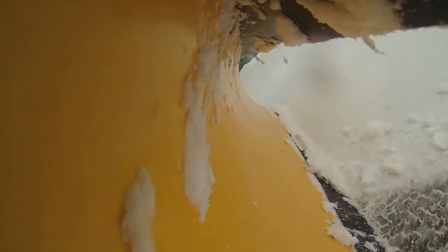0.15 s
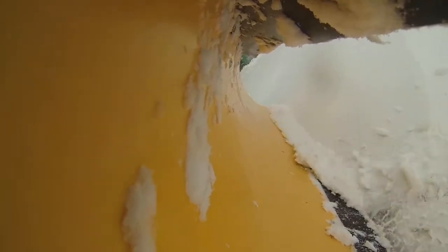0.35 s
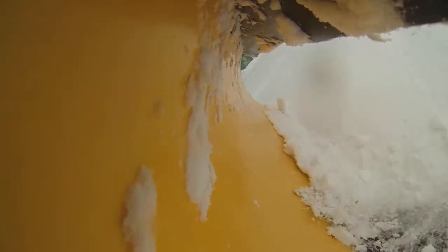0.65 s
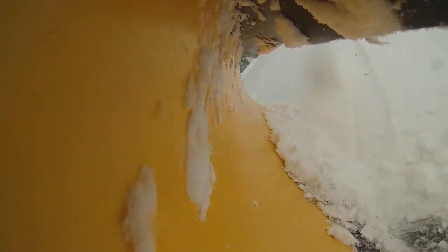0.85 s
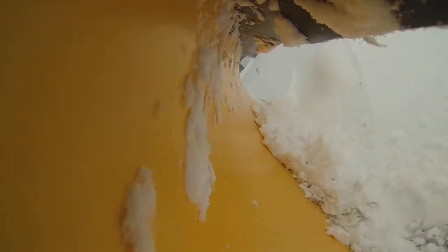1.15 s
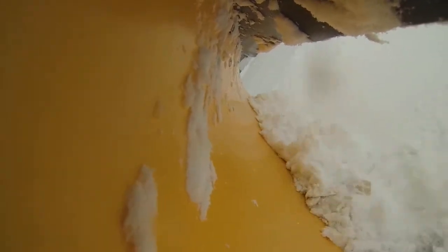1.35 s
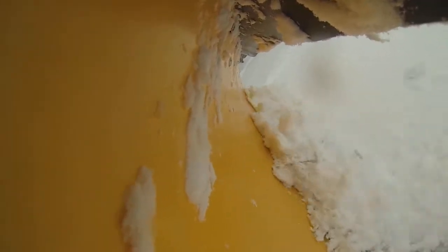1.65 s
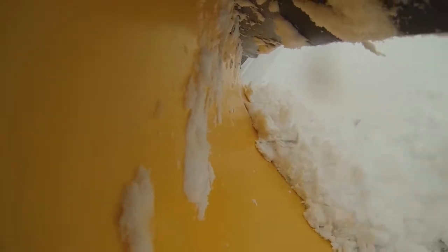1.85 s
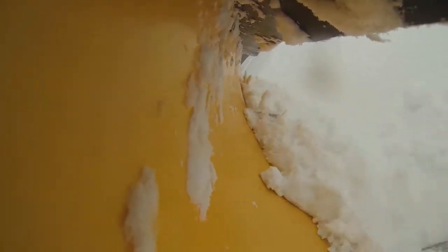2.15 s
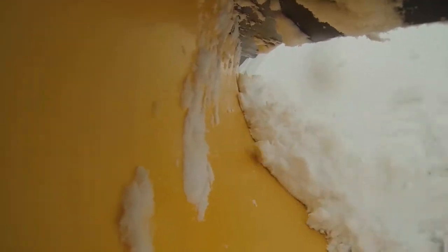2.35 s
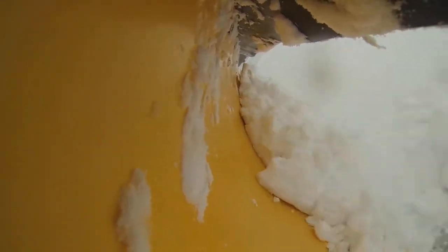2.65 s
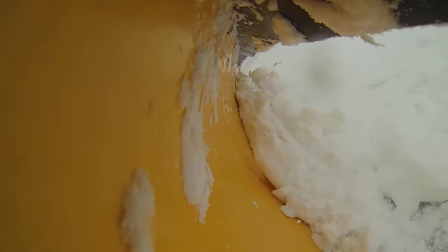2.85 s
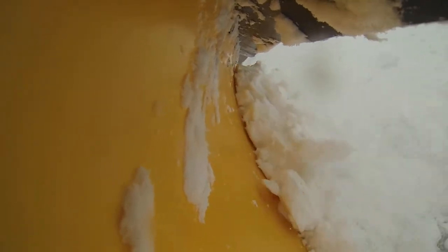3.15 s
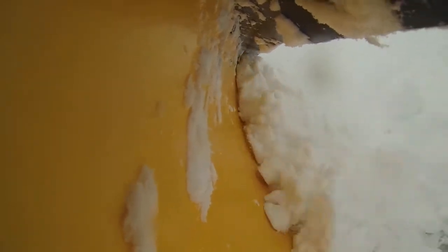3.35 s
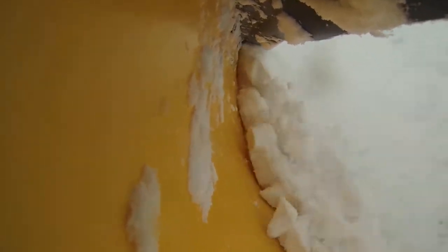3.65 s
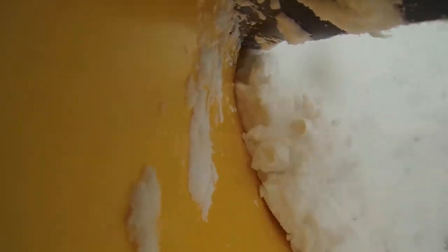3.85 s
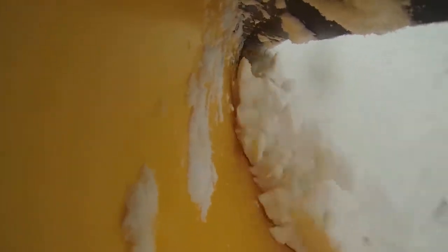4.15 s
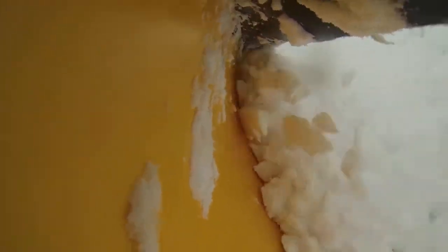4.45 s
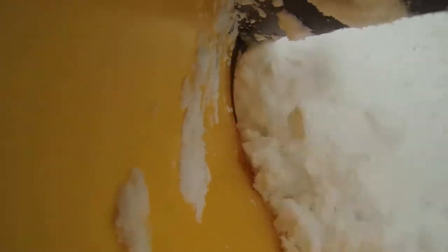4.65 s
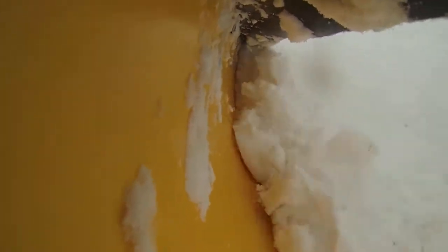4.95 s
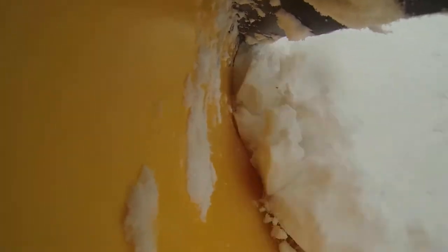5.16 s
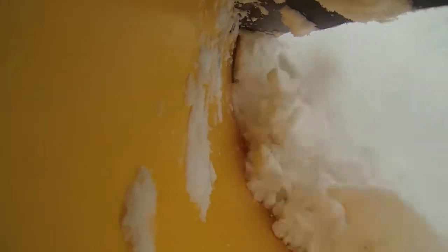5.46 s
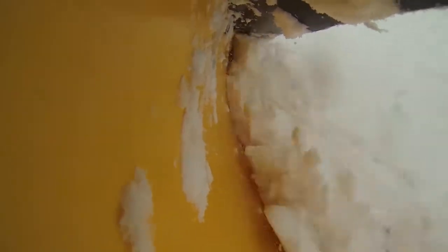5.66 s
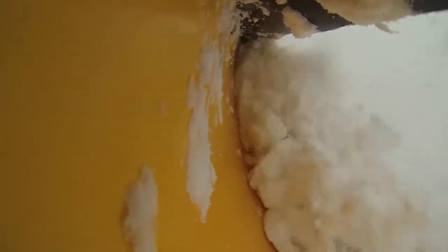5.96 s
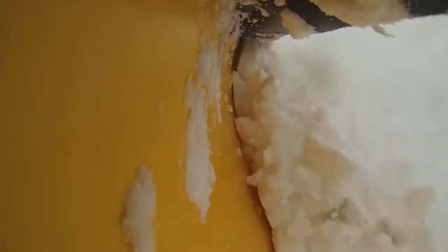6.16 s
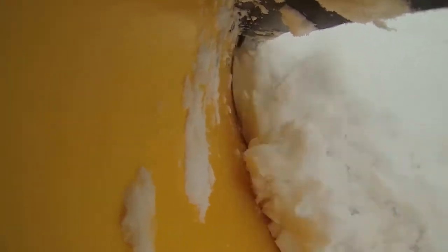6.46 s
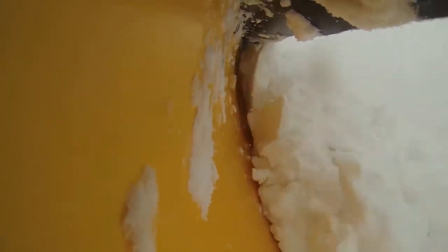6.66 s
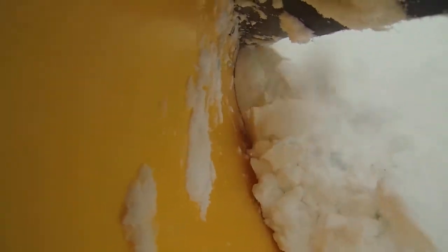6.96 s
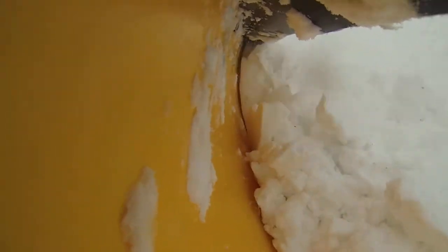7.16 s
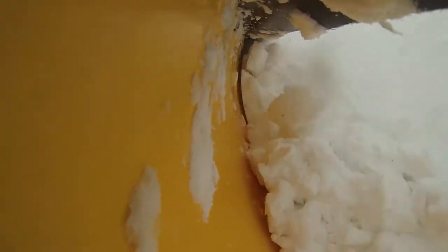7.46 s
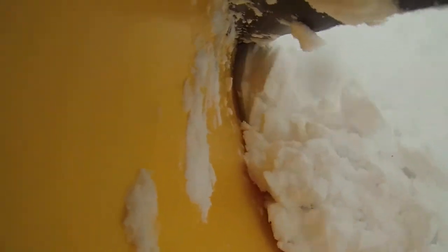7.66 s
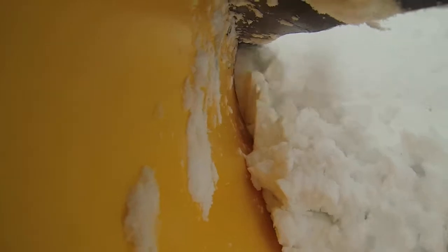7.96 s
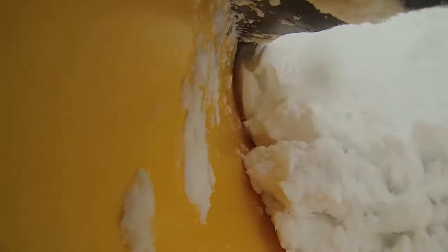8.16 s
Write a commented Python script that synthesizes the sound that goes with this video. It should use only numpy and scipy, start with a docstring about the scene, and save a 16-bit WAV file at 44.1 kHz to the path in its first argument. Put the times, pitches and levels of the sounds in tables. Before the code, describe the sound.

On a snowy paved road, a microphone attached to a plow's steel blade picks up strong, uneven low rumble and a wavering engine drone. A bump and knock open at 0 seconds; brief rough scuffs and hollow shudders come and go until about 1.5, with low chattering around 0.3 to 0.6 and a heavy thump near 1.3. Grinding then builds, the drone strengthens around 2, and a deep blade chatter swells at 2.5. By 2.8 the scrape is dense and gritty, with bright stone ticks. A single sharp, dry click snaps at 3.2 and a thump lands at 3.5. From about 3.8, hollow snow-chunk knocks and metallic snags multiply; the drone surges near 5.25. Between 6.1 and 7.3 they cluster thickly, with a tiny squeak at 6.4. More snags and a louder, very short squeak at 8.1 precede the abrupt end at 8.3.

```python
"""On a paved road a snowplow pushes snow, heard by a camera fixed to its steel blade. The juddering cutting
edge grinds grit: dense random impacts excite plate resonances, with sparse ticks as crackle. The blade shudders
and chatters; chunks, bumps, snags and stones strike it, and it gives two squeaks. One sharp click is heard. The
frame rumbles under the noise of snow sliding on steel, and two wavering sines form the engine drone. The
camera's limiter holds the peaks down."""
import sys
import numpy as np
from scipy import signal
from scipy.fft import rfft, irfft
from scipy.io import wavfile
from scipy.ndimage import uniform_filter1d, minimum_filter1d

SR = 44100
rng = np.random.default_rng(int(sys.argv[2]) if len(sys.argv) > 2 else 0)


def log_audio(samples):
    """Write samples as a 16-bit WAV file to the path given in sys.argv[1]."""
    # one column per channel
    frames = np.atleast_2d(samples).T
    # limit to full scale, then quantise
    limited = np.clip(frames, -1, 1)
    pcm = np.round(limited * 32767).astype(np.int16)
    wavfile.write(sys.argv[1], SR, pcm)


N = 366471
TIME = np.arange(N) / SR  # seconds
TAPS = 16384  # length of a body's impulse response in samples
FREQ = np.maximum(np.arange(TAPS // 2 + 1) * SR / TAPS, 1)  # hertz
REFERENCE_DB = -35  # grinding level at which the shudder and sliding levels are set

# Ringing of the steel plate. Each row: resonance in hertz, width in hertz, relative level in dB.
PLATE_MODES = [(530, 218, -3), (706, 98, 2), (744, 60, 0.5), (936, 360, -8.5), (1182, 120, -1.5),
               (1352, 261, 4), (1508, 270, -4.5), (1966, 240, -18.5), (2295, 600, -25.5), (2820, 210, -24),
               (3060, 260, -24.5), (3560, 690, -29), (4526, 1200, -39), (6100, 3830, -47.5),
               (11000, 8700, -60)]
# Bending of the whole blade. Each row: resonance in hertz, width in hertz, relative level in dB.
BLADE_MODES = [(180.5, 45.3, 2.5), (231.6, 75, 4), (288.6, 90, -0.5), (327.6, 40, -2), (427.6, 63, -10),
               (494, 120, -20.5)]
# Modes of the plow frame. Each row: resonance in hertz, width in hertz, relative level in dB.
FRAME_MODES = [(34.6, 19.1, 1), (52.5, 42, -7), (75.15, 13, 0), (97.8, 42.7, -2), (128, 21, -4.5),
               (149, 14, -7.5), (182.2, 16.6, -10)]
# Larger stones and ice lumps cracking under the edge.
# Each row: start in seconds, loudest short-time level above 2.8 kHz in dB.
STONE_CRACKS = [(0.018, -34), (0.027, -41.5), (0.045, -42.5), (0.185, -41.5), (0.291, -51), (0.349, -44),
                (0.404, -53), (0.585, -50), (0.698, -50), (0.744, -50), (0.856, -48), (0.941, -46),
                (1.002, -34.5), (1.016, -47), (1.265, -46), (1.346, -35), (2.077, -39), (2.177, -34.5),
                (2.809, -33.5), (2.824, -37), (3.502, -36), (3.562, -33.5), (3.618, -28.5), (3.8, -37.5),
                (3.867, -41), (3.884, -33.5), (4.34, -41.5), (4.368, -42), (4.381, -32), (4.467, -43),
                (4.864, -41), (5.308, -41), (5.612, -38), (5.635, -32.5), (5.722, -35.5), (5.845, -33.5),
                (5.898, -34.5), (6.264, -35), (6.322, -37), (6.388, -38), (6.695, -38.5), (6.779, -38),
                (6.811, -38), (6.868, -32), (7.027, -41), (7.055, -35), (7.066, -36), (7.08, -35),
                (7.176, -35), (7.28, -41.5), (7.314, -42), (7.323, -35.5), (7.36, -43), (7.463, -39.5),
                (7.585, -35.5), (7.975, -41), (8.261, -35.5)]


def undb(db):
    """Logarithmic level: decibels become an amplitude ratio."""
    return 10 ** (np.asarray(db) / 20)


def unit(x):
    """Normalization: scale a signal to an rms of one."""
    return x / np.sqrt(np.mean(x ** 2))


def curves(table):
    """Linear interpolation: join each column of a table by straight lines in time."""
    seconds, *columns = np.transpose(table)
    return [np.interp(TIME, seconds, column) for column in columns]


def walk(rate):
    """Band-limited fluctuation: random levels, this many a second, joined by ramps; the rms is one."""
    step = max(int(SR / rate), 2)
    held = np.repeat(rng.standard_normal(N // step + 1), step)
    return unit(uniform_filter1d(held, step)[:N])


def swell(middle, length):
    """Raised-cosine envelope: a smooth rise from 0 to 1 and back around the middle, in seconds."""
    return np.cos(np.pi * np.clip((TIME - middle) / length, -.5, .5)) ** 2


def steady(x, span):
    """Level equalization: divide by the local rms, smoothed twice over this many seconds."""
    width = int(span * SR)
    power = uniform_filter1d(uniform_filter1d(x ** 2, width), width)
    return x / np.sqrt(np.maximum(power, 1e-12))


def add(out, start, sound):
    """Superposition: mix a short sound in at its start in seconds."""
    i = max(int(start * SR), 0)
    out[i:i + len(sound)] += sound[:N - i]


def impacts(rate, spread_db, largest=5.0):
    """Poisson-like impacts, mostly small; the largest lie this many spreads above the smallest."""
    chance = rng.random(N)
    size = np.minimum(rng.exponential(size=N), largest)
    return (chance < rate / SR) * undb(spread_db * size)


def resonances(modes):
    """Modal response: add the powers of steep-sided resonances and return the gain over frequency."""
    power = 0
    for hz, width, db in modes:
        detune = (FREQ / hz - hz / FREQ) * hz / width
        power = power + undb(db) ** 2 / (1 + detune ** 2 / 2) ** 3
    return np.sqrt(power)


def hard_plate():
    """Contact stiffness: a hard, short contact favours the treble of the plate."""
    # Treble emphasis of a hard contact. Each row: frequency in hertz, added gain in dB.
    contact_tone = [(600, -21.5), (1500, -12.5), (2400, 4), (3100, 8), (3700, 2.5), (5000, 7.5),
                    (10500, 13), (15000, 9)]
    hz, db = np.transpose(contact_tone)
    return resonances(PLATE_MODES) * undb(np.interp(np.log(FREQ), np.log(hz), db))


def colours(gain, ripple_db, octaves, count):
    """Position-dependent modal excitation: each struck spot has random humps, spaced in octaves."""
    humps = rng.standard_normal((count, 96))
    position = np.log2(FREQ) / octaves
    ripple = np.array([np.interp(position, np.arange(len(h)), h) for h in humps])
    ripples = undb(ripple_db * ripple)
    return gain * ripples / np.sqrt(np.mean(ripples ** 2, axis=0))


def ring(force, gain):
    """Minimum-phase filtering: pass a force through the causal body that has this gain."""
    cepstrum = irfft(np.log(gain + 1e-7))
    # Folding the cepstrum forward in time makes the response causal.
    cepstrum[1:TAPS // 2] *= 2
    cepstrum[TAPS // 2 + 1:] = 0
    response = irfft(np.exp(rfft(cepstrum)))
    return signal.fftconvolve(force, response)[:len(force)]


def strike(gain, length, above_hz, span):
    """Impulsive excitation: a noise burst rings a body; its loudest span above above_hz has unit rms."""
    t = TIME[:SR // 10]
    force = rng.standard_normal(len(t)) * np.sqrt(t / length) * np.exp(-t / length)
    sound = ring(force, gain)
    highs = signal.sosfilt(signal.butter(4, above_hz, "high", fs=SR, output="sos"), sound)
    return sound / np.sqrt(uniform_filter1d(highs ** 2, int(span * SR)).max())


def scuffing():
    """Contact load modulation: the edge digs in, adding dB of grinding and shudder, then lets go."""
    # The edge digs in and scuffs. Each row: start of the full scuff in seconds, its length in seconds,
    # extra grinding in dB, extra shudder in dB.
    scuff_events = [(0.012, 0.009, 10, 8), (0.252, 0.096, 7, 7.5), (0.528, 0.055, 9.5, 9.5),
                    (0.736, 0.05, 5.5, 8.5), (0.983, 0.085, 6.5, 6), (1.293, 0.074, 9, 10),
                    (1.534, 0.1, 6.5, 10), (2.013, 0.18, 5, 2), (3.192, 0.31, 2.5, 4.5),
                    (3.928, 0.075, 0.5, 6), (5.14, 0.13, 3.5, 6.5), (5.589, 0.17, 2.5, 2.5),
                    (6.133, 0.12, 1, 5.5), (6.802, 0.09, 5.5, 4.5), (7.034, 0.21, 3.5, 4.5),
                    (7.976, 0.15, 2.5, 3.5)]
    attack_s, release_s = 0.0092, 0.032  # the attack precedes the full scuff
    grind, shake = np.zeros(N), np.zeros(N)
    for start, length, grind_db, shake_db in scuff_events:
        rise = np.clip((TIME - start) / attack_s + 1, 0, 1)
        fall = np.clip(1 - (TIME - start - length) / release_s, 0, 1)
        grind += grind_db * rise * fall
        shake += shake_db * rise * fall
    return grind, shake


def lifting():
    """Loss of contact: the edge rides up, and grinding and shaking change by a smooth dip in dB."""
    # The edge loses its grip. Each row: middle in seconds, length in seconds,
    # drop of the grinding in dB, drop of the shaking in dB (negative is a rise).
    lift_events = [(0.143, 0.23, 3.5, 8), (0.688, 0.1, 5.5, 0.5), (0.86, 0.089, 13.5, 7),
                   (1.197, .15, 11, 14), (1.467, .14, 4, 4), (2.935, 0.16, 3.5, 3), (3.715, 0.096, 4, -1),
                   (4.155, 0.051, 10.5, 7), (5.059, 0.34, 2.5, 2), (5.948, 0.13, 8.5, 4),
                   (6.428, 0.18, 4, 5), (7.922, 0.11, 3, 0), (8.185, 0.057, 9, 10)]
    grind, shake = np.zeros(N), np.zeros(N)
    for middle, length, grind_db, shake_db in lift_events:
        height = swell(middle, length)
        grind += grind_db * height
        shake += shake_db * height
    return grind, shake


def crumbling():
    """Fragmentation: crumbs gather under the edge around each stone; their density runs from 0 to 1."""
    crumble_s, lead_s = 0.035, 0.027  # the crumbs begin shortly before the stone's crack
    crumbs = np.zeros(N)
    for start, _ in STONE_CRACKS:
        add(crumbs, start - lead_s, np.hanning(int(crumble_s * SR)))
    return np.minimum(crumbs, 1)


def grinding(judder, bite_db):
    """Dense random excitation: grains ring the plate in bursts as the contact hops along the edge."""
    force = impacts(rate=2800, spread_db=0.94) * rng.standard_normal(N) * undb(2.2 * judder)
    cushion_hz = 6500  # packed snow softens these contacts
    gain = resonances(PLATE_MODES) / np.sqrt(1 + (FREQ / cushion_hz) ** 6)
    spots = colours(gain, ripple_db=3.5, octaves=.25, count=5)
    hops = np.cumsum(impacts(rate=110, spread_db=0) > 0)
    contact = rng.integers(len(spots), size=N)[hops]
    sound = sum(ring(force * (contact == k), spot) for k, spot in enumerate(spots))
    return steady(sound, span=0.054) * undb(bite_db)


def crackle(judder, bite_db):
    """Brittle fracture: grit and ice tick, dull or bright, clustering under load and around stones."""
    crumbs = crumbling()
    excess_db = bite_db - bite_db.mean()
    density_db = 0.33 * excess_db + 1.9 * judder + 2.5 * walk(rate=24) + 3.0 * crumbs
    rate = 125 * undb(density_db)  # ticks per second
    bursts = impacts(rate, spread_db=9.0, largest=1.5) * undb(2.1 * crumbs + 0.39 * excess_db)
    brittle_hz = 9000  # ice breaks less sharply than stone
    gain = hard_plate() / np.sqrt(1 + (FREQ / brittle_hz) ** 4)
    spots = colours(gain, ripple_db=6, octaves=.7, count=4)
    contact = rng.integers(len(spots), size=N)
    grit = rng.standard_normal(N)
    fade = [1, -np.exp(-1 / (0.00074 * SR))]  # each tick decays with a 0.74 ms time constant
    sound = np.zeros(N)
    for k, spot in enumerate(spots):
        envelope = signal.lfilter([1], fade, bursts * (contact == k))
        sound += ring(envelope * grit, spot)
    return unit(sound) * undb(-48.0)


def sliding(bite_db):
    """Friction noise: snow on steel excites a faint band near 3 kHz that follows the bite of the edge."""
    # The plate singing under snow. Each row: resonance in hertz, width in hertz, relative level in dB.
    slide_modes = [(3045, 240, 0)]
    scrape = unit(ring(rng.standard_normal(N), resonances(slide_modes)))
    return scrape * undb(-72.5 + .5 * (bite_db - REFERENCE_DB) + 1.1 * walk(rate=25))


def shudder(judder, load_db, grip_db):
    """Bending vibration: judder shakes the whole blade, a hollow clatter that grows with the load."""
    force = impacts(rate=800, spread_db=0.93) * rng.standard_normal(N) * undb(1.4 * judder)
    reference_shudder_db, db_per_load_db = -25, 0.75
    db = reference_shudder_db + db_per_load_db * (load_db - REFERENCE_DB) + grip_db
    return steady(ring(force, resonances(BLADE_MODES)), span=0.065) * undb(db)


def rumble(lift_db):
    """Structure-borne vibration: road bumps shake the frame; all but the deepest eases in a lift."""
    force = impacts(rate=400, spread_db=0.5) * rng.standard_normal(N)
    frame = steady(ring(force, resonances(FRAME_MODES)), span=0.07)
    deep_hz = 56  # rumble well below this goes on when the edge lifts
    deep = signal.sosfiltfilt(signal.butter(2, deep_hz, fs=SR, output="sos"), frame)
    eased = deep + (frame - deep) * undb(-lift_db)
    return eased * undb(-14 + 1.08 * walk(rate=4.2))


def engine():
    """Harmonic excitation: the firing rate and its weaker octave drone through the mount and waver."""
    # Course of the drone. Each row: time in seconds, level in dB before its random waver.
    engine_levels = [(0, -33), (1.3, -26.5), (2.0, -21), (3.3, -23), (4.6, -28), (5.25, -18), (5.8, -24),
                     (8.31, -31.5)]
    firing_hz = 95.4  # central rate
    db, = curves(engine_levels)
    phase = 2 * np.pi * np.cumsum(firing_hz * (1 + 0.0271 * walk(rate=25))) / SR
    drone = np.sin(phase) + undb(-15.5) * np.sin(2 * phase)
    return unit(drone) * undb(db + 3.2 * walk(rate=14))


def chunk_knocks():
    """Impulse response of the blade: packed chunks of snow knock hollowly, with a little plate ring."""
    # Knocking chunks. Each row: start in seconds, loudest short-time level above 200 Hz in dB.
    chunk_hits = [(0.012, -16.5), (3.956, -15), (4.315, -19), (4.553, -16), (5.132, -14), (5.425, -18),
                  (5.728, -15.5), (6.227, -16), (6.666, -14), (6.803, -14), (7.062, -16), (7.143, -22)]
    out = np.zeros(N)
    blade = np.hypot(resonances(BLADE_MODES), undb(-21.5) * resonances(PLATE_MODES))
    for start, db in chunk_hits:
        add(out, start, strike(blade, length=0.0063, above_hz=200, span=0.0057) * undb(db))
    return out


def frame_thumps():
    """Impulse response of the frame: bumps in the road excite its low modes."""
    # Thumping bumps. Each row: start in seconds, loudest short-time level above 55 Hz in dB.
    bump_hits = [(0.013, -9.5), (1.257, -7.5), (3.485, -7), (4.331, -10.5), (6.262, -9), (7.235, -8.5),
                 (8.141, -11)]
    out, frame = np.zeros(N), resonances(FRAME_MODES)
    for start, db in bump_hits:
        add(out, start, strike(frame, length=0.0039, above_hz=55, span=0.0073) * undb(db))
    return out


def snag_knocks():
    """Impulse response of the plate: the edge snags on the pavement, each time more or less hollow."""
    # Snags. Each row: start in seconds, loudest short-time level above 1 kHz in dB,
    # extra hollow ring below 1 kHz in dB.
    snag_hits = [(0.016, -25.5, -12), (2.645, -28, -1), (3.774, -23.5, -5), (3.962, -24, -0.5),
                 (4.318, -30, 7), (5.74, -22.5, -3), (5.879, -24.5, -6), (6.116, -32, 21),
                 (6.203, -20.5, -1), (6.669, -21.5, 3.5), (6.811, -23.5, -5), (6.858, -23, 1),
                 (7.024, -21.5, 4), (7.049, -19.5, -1), (7.074, -27, 7), (7.16, -21, -0.5),
                 (7.114, -25, -2), (7.788, -24.5, -6.5), (7.837, -24.5, 0), (7.983, -21.5, -4),
                 (8.061, -26, 4), (8.139, -23, 1)]
    out, plate = np.zeros(N), resonances(PLATE_MODES)
    knock_hz = 1000
    hollow = 1 / (1 + (FREQ / knock_hz) ** 10)
    for start, db, hollow_db in snag_hits:
        body = plate * undb(hollow_db * hollow)
        add(out, start, strike(body, length=0.0033, above_hz=knock_hz, span=0.0029) * undb(db))
    return out


def stone_ticks():
    """Hard-contact impulse response: stones tick on the plate, each with its own colour."""
    out = np.zeros(N)
    spots = colours(hard_plate(), ripple_db=1.5, octaves=0.95, count=len(STONE_CRACKS))
    for (start, db), spot in zip(STONE_CRACKS, spots):
        add(out, start, strike(spot, length=0.00086, above_hz=2800, span=0.0013) * undb(db))
    return out


def chatters(judder):
    """Stick-slip locking: the blade holds roughly onto one resonance, swells and lets go."""
    # Chattering notes. Each row: middle in seconds, central frequency in hertz,
    # level in dB before a 2 dB boost and the judder, length in seconds.
    chatter_notes = [(0.279, 745, -27, 0.025), (0.299, 215, -20.5, 0.18), (0.406, 126.6, -18.5, 0.49),
                     (0.566, 175.3, -16.5, 0.13), (2.468, 181.4, -19.5, 0.9), (2.508, 131.2, -14, 0.55)]
    out = np.zeros(N)
    wobble_hz = 12 * walk(rate=120) + 5 * walk(rate=10)
    drive = unit(undb(2 * judder))
    for middle, hz, db, length in chatter_notes:
        note = np.sin(2 * np.pi * np.cumsum(hz + wobble_hz) / SR)
        out += undb(db + 2.0) * swell(middle, length) * drive * note
    return out


def dry_click():
    """Step with exponential decay: one sharp, dry click."""
    # The click. Its single row: start in seconds, peak level in dB, decay time constant in seconds.
    click_event = (3.204, -2.2, 0.0019)
    out = np.zeros(N)
    start, db, decay = click_event
    add(out, start, -undb(db) * np.exp(-TIME[:SR // 10] / decay))
    return out


def squeaks():
    """Stick-slip oscillation: the edge sticks for an instant and sounds a short sine."""
    # Squeaks. Each row: start in seconds, frequency in hertz, peak level of the envelope in dB,
    # twice the envelope's decay time constant in seconds.
    squeak_notes = [(6.374, 1450, -16, 0.0033), (8.131, 1330, -6, 0.0033)]
    out, t = np.zeros(N), TIME[:SR // 10]
    for start, hz, db, decay in squeak_notes:
        envelope = (t / decay * 2) * np.exp(1 - t / decay * 2)
        add(out, start, undb(db) * envelope * np.sin(2 * np.pi * hz * t))
    return out


def scene():
    """Common excitation: load, scuffs and lifts set the bite, and one judder drives the edge and blade."""
    # Snow piles up and presses the edge down. Each row: time in seconds,
    # grinding level in dB before scuffs, lifts and bumps.
    load_levels = [(0, -47), (1.45, -44.5), (1.7, -40.5), (2.2, -37), (2.75, -33), (3.0, -35.5),
                   (3.25, -34.5), (4.7, -33), (5.4, -37.5), (5.7, -33.5), (7.2, -32), (8.31, -32.5)]
    load_db, = curves(load_levels)
    scuff_grind_db, scuff_shake_db = scuffing()
    lift_grind_db, lift_shake_db = lifting()
    bumps_db = 1.5 * walk(rate=18)  # small bumps in the pavement
    bite_db = load_db + scuff_grind_db - lift_grind_db + bumps_db
    grip_db = scuff_shake_db - lift_shake_db + bumps_db
    judder = unit(walk(rate=190) + 1.2 * walk(rate=45))  # uneven stick and slip of the edge
    edge = grinding(judder, bite_db) + crackle(judder, bite_db) + sliding(bite_db)
    blade = shudder(judder, load_db, grip_db) + chatters(judder)
    knocks = chunk_knocks() + frame_thumps() + snag_knocks() + stone_ticks()
    brief = dry_click() + squeaks()
    return (edge + blade + knocks + brief + rumble(lift_shake_db) + engine())[None]


def record(dry):
    """Peak limiting and band limiting: the camera ducks around high peaks and cuts the extreme treble."""
    ceiling, top_hz = 0.85, 15900  # the ceiling applies ahead of the low-pass filter
    hold = int(0.0092 * SR)
    gain = np.minimum(1, ceiling / (np.abs(dry[0]) + 1e-9))
    gain = uniform_filter1d(minimum_filter1d(gain, hold), hold)
    gain = gain * np.minimum(1, (TIME[-1] - TIME) / .004)  # 4 ms fade at the end
    low_pass = signal.ellip(8, .2, 70, top_hz, fs=SR, output="sos")
    return signal.sosfilt(low_pass, dry * gain)


dry = scene()
out = record(dry)
log_audio(out)
```